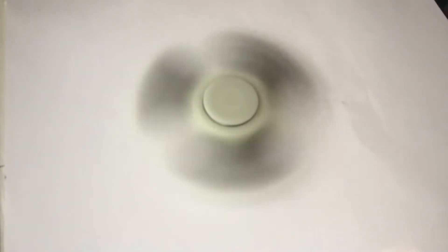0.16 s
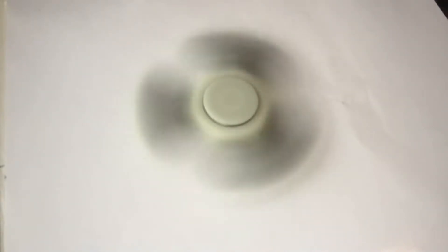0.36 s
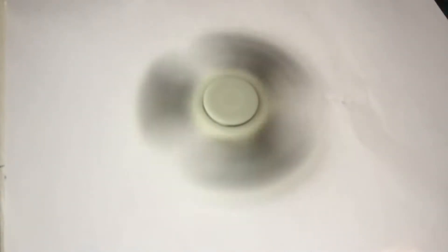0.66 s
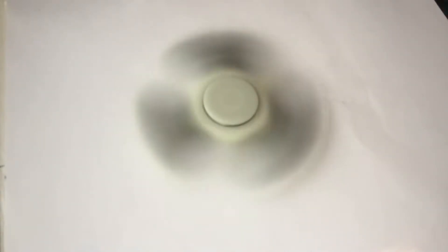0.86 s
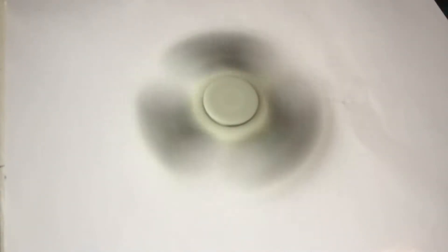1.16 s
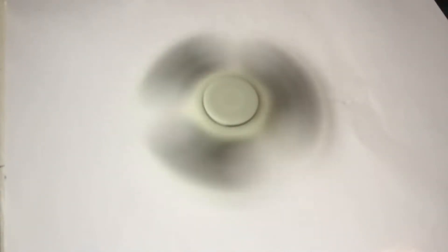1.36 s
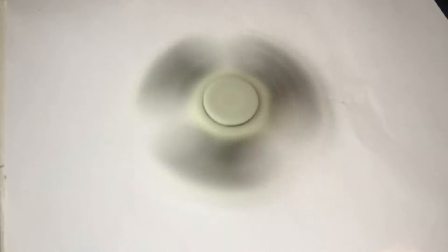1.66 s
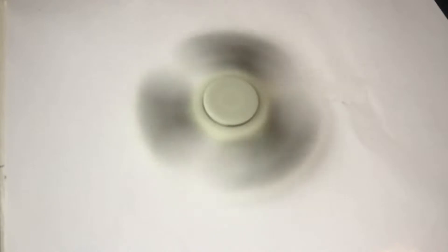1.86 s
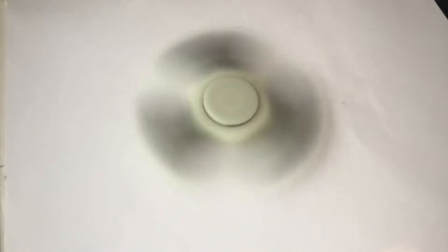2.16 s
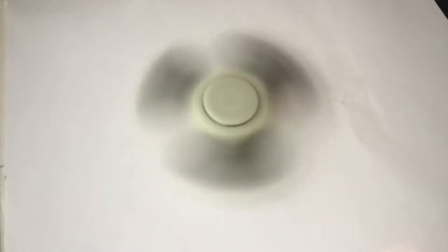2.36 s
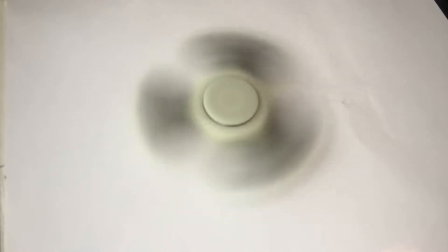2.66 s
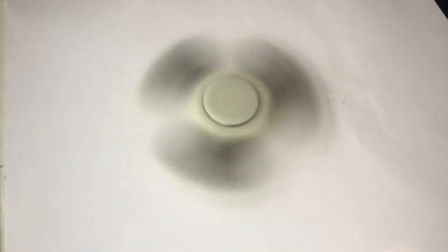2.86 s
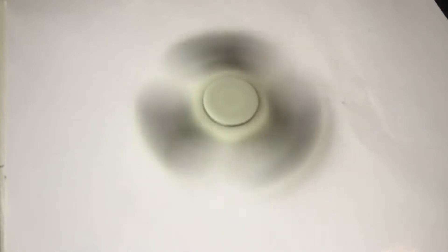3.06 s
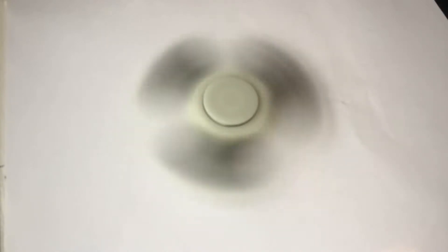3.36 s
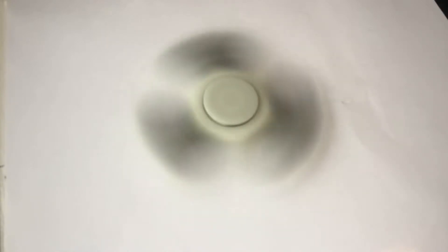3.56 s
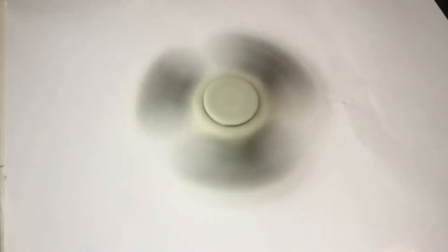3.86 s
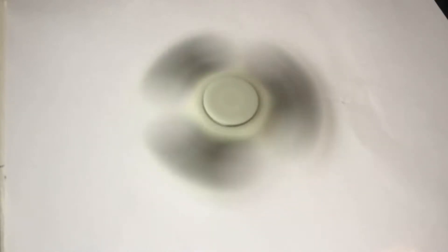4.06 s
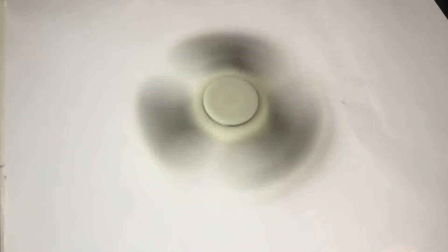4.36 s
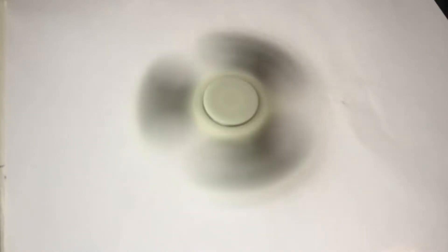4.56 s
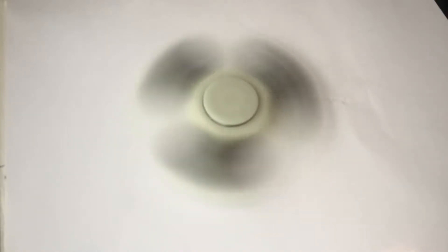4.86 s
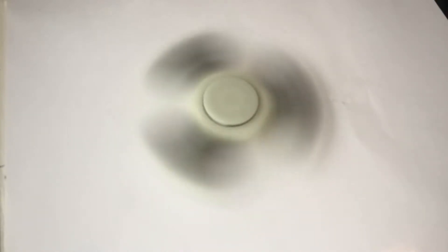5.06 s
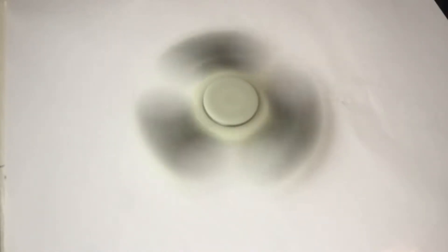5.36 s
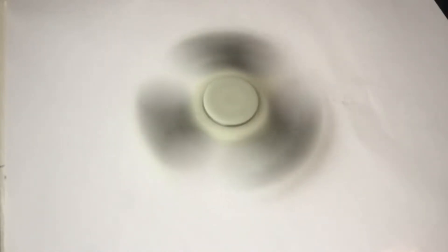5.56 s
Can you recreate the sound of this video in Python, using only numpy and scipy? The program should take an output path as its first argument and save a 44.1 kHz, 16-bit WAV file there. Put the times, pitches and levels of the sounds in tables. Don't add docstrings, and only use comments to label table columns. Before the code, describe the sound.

A small plastic three-armed spinner coasts on a hard table, heard very close through a mono microphone in a quiet room with short reflections. From the start a thin, dry, hissing rattle of bearing balls runs continuously, bright in the treble, fluttering at about eleven turns a second, with a weaker boxy buzz from the table. A light tap and brief bright rub open it; soft low bumps cluster from 0.2 to 0.8 seconds, with a dull rub around 0.6. More muffled knocks come at about 1.05, 1.2 and 1.7. A clearer, sharper tap lands at 2.1, another at 2.3, then hand rubbing with low rumble, strongest near 2.7. Small taps follow at 3.3 and 3.6, a livelier pair around 4.0 to 4.2, and faint ones at 4.5 and 5.25. The rattle flares briefly at times, slowly easing and softening until the end at 5.7, still spinning, over faint air hiss.

```python
import sys
import numpy as np
from scipy import signal
from scipy.fft import rfft, irfft
from scipy.io import wavfile
from scipy.ndimage import uniform_filter1d

SR = 44100
rng = np.random.default_rng(int(sys.argv[2]) if len(sys.argv) > 2 else 0)


def store_wav(level_fs):
    pcm = np.round(np.clip(np.atleast_2d(level_fs), -1, 1) * 32767)
    wavfile.write(sys.argv[1], SR, pcm.T.astype(np.int16))


def makeup_ratio(level_db):
    decades = np.asarray(level_db, float) / 20
    return 10 ** decades


N = 252119
CAGE = .64


def evened(x):
    return x / np.sqrt(np.mean(x ** 2) + 1e-20)


def add(mix, start_s, sound):
    part = mix[round(start_s * SR):][:len(sound)]
    part += sound[:len(part)]


def resonate(x, hz, width_hz, order=2):
    r = np.exp(-np.pi * width_hz * np.sqrt(order) / SR)
    g = (1 - r ** 2) / 2
    section = [g, 0, -g, 1, -2 * r * np.cos(2 * np.pi * hz / SR), r ** 2]
    return signal.sosfilt([section] * order, x)


def wander(hz):
    rate = np.fft.rfftfreq(N, 1 / SR) / hz
    gain = rate / (.4 + rate) / (1 + rate ** 2)
    return evened(irfft(rfft(rng.standard_normal(N)) * gain, N))


START_TURNS_PER_S, SLOWING_TURNS_PER_S2, EASING_TURNS_PER_S3 = 11.39, .24, .004


def turns_at(t):
    return START_TURNS_PER_S * t - SLOWING_TURNS_PER_S2 * t ** 2 / 2 + EASING_TURNS_PER_S3 * t ** 3 / 3


def balls(contacts_per_s=2500, spread_db=3.5, smooth=0.86, flicker_db=0.92, flicker_hz=50):
    size = makeup_ratio(spread_db * np.minimum(rng.exponential(1, N), 5)) * rng.choice([-1, 1], N)
    contacts = evened(size * (rng.random(N) < contacts_per_s / SR))
    rolling = smooth * rng.standard_normal(N) + np.sqrt(1 - smooth ** 2) * contacts
    return rolling * makeup_ratio(flicker_db * wander(flicker_hz))


# lobes_per_turn (of body or cage), centre_hz, reach_hz, depth (of power), angle_turns
BEAMS = [(1, 3300, 250, .23, -.45), (1, 5200, 600, .6, .34), (1, 7250, 450, .45, .34),
         (1, 8100, 350, .14, -.45), (1, 9500, 500, .22, .16), (1, 11100, 700, .42, -.09),
         (2, 3300, 250, .14, .01), (2, 3850, 350, .19, .23), (2, 4550, 350, .22, .4),
         (2, 5400, 330, .25, -.21), (2, 6080, 450, .5, .07), (2, 8000, 400, .14, -.02),
         (2, 9300, 600, .19, .31), (2, 15600, 900, .32, .18), (3, 4000, 600, .11, -.36),
         (3, 6150, 350, .19, -.13), (3, 7300, 480, .55, .1), (3, 8350, 800, .33, .48),
         (3, 11100, 900, .62, -.2), (CAGE, 3550, 600, .4, -.13), (CAGE, 5100, 900, .26, .33)]


def beaming(hz, turns):
    lobes, centre_hz, reach_hz, depth, angle_turns = np.transpose(BEAMS)
    share = depth * np.exp(-((hz - centre_hz) / reach_hz) ** 2)
    return share @ np.cos(2 * np.pi * (np.outer(lobes, turns) + angle_turns[:, None]))


# pitch_hz, width_hz, level_db
TABLE_MODES = [(275, 63, -73), (390, 46, -82.5), (495.3, 31, -77.5), (680.7, 41, -78), (856, 33, -84),
               (926, 51, -86), (973, 28, -87.5), (1044.6, 29, -78.5), (1192, 52, -82.5), (1306, 46, -80.5),
               (1388, 78, -84.5), (1490, 150, -78.5), (1630, 43, -78.5), (1746, 64, -78.5), (1914, 96, -84),
               (2074, 74, -81.3), (2192, 21, -79), (2300, 48, -78.5), (2377, 34, -75.5), (2454, 38, -77),
               (2534, 104, -79), (2629, 37, -78), (2717, 51, -79.5), (2830, 74, -82)]
# pitch_hz, width_hz, level_db
BODY_MODES = [(3231, 222, -62.5), (3375, 142, -60), (3710, 315, -60), (3970, 450, -62), (4397, 290, -60.5),
              (4738, 250, -61.5), (5157, 330, -62.5), (5355, 204, -60.5), (5795, 690, -66),
              (5866, 188, -62.5), (6170, 300, -62), (6800, 320, -64.5), (7023, 200, -59.5),
              (7445, 350, -62), (7980, 220, -63), (8420, 390, -61), (8890, 320, -66), (9450, 530, -64.5),
              (10950, 400, -70.5), (11450, 1140, -80), (15600, 2400, -76)]
ROCKING = [(1, .3, .36), (2, .12, .15), (3, .1, .15), (CAGE, .1, .4)]
# peak_s, level_db
FLARES = [(.4, 2.5), (1.053, 1), (1.395, 1), (1.555, 3.5), (1.695, 3), (1.835, 2), (2.295, 2), (2.5, 2.5),
          (4.01, 2), (4.095, 4.5), (4.485, 3), (4.625, 3), (4.91, 2), (5.225, 3)]
FLARE_S, FLARE_TOP_HZ = 0.017, 5640
RATTLE_DB, RATTLE_DB_PER_TURN_PER_S = 3.5, 1.77


def spinner(table_patch_db=3.0, body_patch_db=1.61, patch_hz=28, lobe_gain=0.97):
    step = 32
    t = np.arange(0, N + step, step) / SR
    turns = turns_at(t)
    lost_turns_per_s = START_TURNS_PER_S - np.gradient(turns_at(np.arange(N) / SR)) * SR
    drive = balls() * makeup_ratio(RATTLE_DB - RATTLE_DB_PER_TURN_PER_S * lost_turns_per_s)
    flare_db = sum(db * np.exp(-((t - s) / FLARE_S) ** 2) for s, db in FLARES)
    rocking = sum(depth * np.cos(2 * np.pi * (lobes * turns + angle)) for lobes, depth, angle in ROCKING)
    out = np.zeros(N)
    for k, (hz, width_hz, db) in enumerate(TABLE_MODES + BODY_MODES):
        in_table = k < len(TABLE_MODES)
        power = 1 + lobe_gain * (rocking if in_table else beaming(hz, turns))
        drift_hz = patch_hz * rng.uniform(.27, 1, 6)
        drift = sum(np.sin(2 * np.pi * (f * t + rng.random())) for f in drift_hz) / np.sqrt(3)
        patch_db = table_patch_db if in_table else body_patch_db
        mode_db = patch_db * drift + flare_db / (1 + (hz / FLARE_TOP_HZ) ** 6)
        beam = np.sqrt(np.maximum(power, .03)) * makeup_ratio(mode_db)
        ring = makeup_ratio(db) * evened(resonate(drive, hz, width_hz))
        out += (-1) ** k * ring * np.repeat(beam, step)[:N]
    return out


def room(x, t60_s=0.17, gap_s=.003, wet_db=-11):
    t = np.arange(SR // 4) / SR
    turns = turns_at(np.arange(N) / SR)
    tails = rng.standard_normal((4, len(t))) * makeup_ratio(-60 * t / t60_s) * (t > gap_s)
    tails = tails / np.linalg.norm(tails[0])
    facing = np.maximum(np.cos(2 * np.pi * (turns - np.arange(4)[:, None] / 4)), 0)
    wet = signal.oaconvolve(x * facing, tails, axes=1)[:, :N].sum(0)
    return (x + makeup_ratio(wet_db) * wet) / np.sqrt(1 + makeup_ratio(2 * wet_db))


# peak_s, fade_s (to fall by FADE_DB), rub_db, bright_over_rub_db, rumble_db
STROKES = [
    (0, 0.02, -67.5, 15, -71),
    (.15, 0.5, -79, 7, -80),
    (.58, 0.64, -75, -10, -71.5),
    (2.17, 0.1, -80, 10, -79),
    (2.31, 0.2, -78.5, 15.5, -67.5),
    (2.48, 0.08, -71.5, 12.5, -74),
    (2.71, 0.27, -65, -0.5, -67),
    (3.5, 1.7, -81, 7, -80),
    (5.2, .5, -89, -10, -79.5),
    (5.75, 0.2, -81, 9, -86),
]
FADE_DB, RESTING_DB = 10, -85
# pitch_hz, width_hz, level_db
BRIGHT_MODES = [(1040, 80, -20), (1390, 170, 0), (1620, 120, -4), (1780, 110, -2), (2900, 1800, -3)]


def hand():
    peak_s, fade_s, rub_db, bright_db, rumble_db = np.transpose(STROKES)
    from_peak_s = abs(np.arange(N) / SR - peak_s[:, None])
    swell_power = makeup_ratio(-2 * FADE_DB * from_peak_s / fade_s[:, None])
    levels_db = (rub_db, rub_db + bright_db, rumble_db)
    dull, bright, weight = (np.sqrt(makeup_ratio(2 * db) @ swell_power) for db in levels_db)
    noise = rng.standard_normal((3, N))

    rumble_modes = [(48, 30, 0), (134.4, 34, 4.0), (171, 27, 3.0)]
    rumble = evened(sum(makeup_ratio(db) * evened(resonate(noise[0], hz, w)) for hz, w, db in rumble_modes))
    rumble = rumble * np.hypot(weight, makeup_ratio(RESTING_DB))

    rub_modes = BRIGHT_MODES[1:] + [(2030, 230, -0.3), (4400, 2700, 0.92)]
    bright_rub = sum(makeup_ratio(db) * evened(resonate(noise[2], hz, 0.64 * w)) for hz, w, db in rub_modes)
    rub = dull * evened(resonate(noise[1], 377, 260)) + bright * evened(bright_rub)
    return rumble * makeup_ratio(2.1 * wander(35)) + rub * makeup_ratio(2.4 * wander(40))


# pitch_hz, level_db_per_hz
AIR_SPECTRUM = [(22, -28), (55, -4.5), (125, -4), (220, -6), (330, -5.5), (600, -6), (800, -5),
                (1120, -8.5), (2000, -8), (2800, -19.5), (5000, -7.5), (13000, -16.5), (15000, -25),
                (15700, -28)]
AIR_DB = -66.5


def air():
    hz, db = np.transpose(AIR_SPECTRUM)
    gain = makeup_ratio(np.interp(np.log(np.fft.rfftfreq(N, 1 / SR) + 1), np.log(hz), db))
    return makeup_ratio(AIR_DB) * evened(irfft(rfft(rng.standard_normal(N)) * gain, N))


# start_s, dull_peak_db, spot_hz (favoured there), bright_peak_db, rattle_s
TAPS = [(.016, -52.5, 570, -51.5, .015), (.47, -57, 620, -56, 0.0062), (1.051, -59, 850, -50.5, 0.0083),
        (2.102, -48.5, 400, -43.5, 0.015), (2.194, -69, 310, -57, .0088), (2.298, -62, 470, -48.5, .012),
        (3.31, -68.5, 480, -68, .008), (3.608, -60, 750, -50.5, .004), (3.998, -53.5, 560, -59, 0.017),
        (4.075, -55, 500, -47.5, 0.0022), (4.077, -46.5, 340, -70, .0068), (4.172, -58, 310, -54, .0054),
        (4.49, -57.5, 700, -62, .011), (5.26, -57, 450, -59, 0.016)]
# pitch_hz, width_hz
LOW_MODES = [(310, 67), (490, 104), (690, 41)]
SPOT_DB_PER_OCTAVE_SQUARED = 30


def taps():
    out, t = np.zeros(N), np.arange(SR // 5) / SR
    for start_s, dull_db, spot_hz, bright_db, rattle_s in TAPS:
        contact = 0.13 * rng.standard_normal(len(t)) * np.exp(-t / rattle_s) + (t == 0)
        rings = [resonate(contact, hz, w) for hz, w in LOW_MODES]
        rings.append(sum(makeup_ratio(db) * resonate(contact, hz, w) / w for hz, w, db in BRIGHT_MODES))
        peaks_db = [dull_db - SPOT_DB_PER_OCTAVE_SQUARED * np.log2(hz / spot_hz) ** 2 for hz, w in LOW_MODES]
        peaks_db.append(bright_db)
        add(out, start_s, sum(makeup_ratio(db) * ring / abs(ring).max() for db, ring in zip(peaks_db, rings)))
    low_cut = signal.butter(3, 210, "high", fs=SR, output="sos")
    return signal.sosfilt(low_cut, out)


# start_s, peak_db, pitch_hz
BUMPS = [(.231, -60, 137), (.299, -51, 65), (.305, -50, 122), (.322, -48.5, 190), (.33, -56, 483),
         (.497, -49.5, 130), (.52, -56, 120), (1.235, -66, 55), (.547, -53.5, 322), (.55, -63, 61.6),
         (.554, -58, 194), (.661, -52, 284), (.762, -51, 242), (.77, -63, 126), (1.215, -50.5, 210),
         (1.216, -58.5, 390), (1.226, -54, 129), (1.39, -63, 132), (1.667, -53.5, 272), (2.1, -65, 125),
         (2.29, -63, 302), (2.3, -68, 65), (2.468, -62, 64.4), (2.478, -61, 123), (2.585, -62, 143),
         (3.3, -63.5, 1045), (3.31, -63, 288), (4.005, -61, 1050), (5.25, -72, 60)]
# pitch_hz, rise_s, t60_s
BUMP_SHAPE = [(63, .019, .14), (128, 0.015, 0.2), (207, 0.011, 0.07), (290, .009, 0.082), (480, .008, .075),
              (1040, .007, .16)]


def bumps():
    out, t = np.zeros(N), np.arange(SR // 2) / SR
    pitch_hz, rises_s, t60s_s = np.transpose(BUMP_SHAPE)
    for start_s, peak_db, hz in BUMPS:
        rise_s = np.interp(np.log(hz), np.log(pitch_hz), rises_s)
        t60_s = np.interp(np.log(hz), np.log(pitch_hz), t60s_s)
        swell = np.sin(np.pi / 2 * np.minimum(t / rise_s, 1)) ** 2
        decay = makeup_ratio(-60 * np.maximum(t - rise_s, 0) / t60_s)
        add(out, start_s, makeup_ratio(peak_db) * swell * decay * np.sin(2 * np.pi * hz * t))
    return out


def scene():
    mono = room(spinner() + bumps()) + hand() + air() + taps()
    return np.array([mono, mono])


def masked(x, below_db=16.2, slope_db_per_hz=.0033, from_hz=5000):
    hz, _, z = signal.stft(x, SR, nperseg=2048, noverlap=1536)
    power = uniform_filter1d(abs(z) ** 2, size=7, axis=0)
    power = uniform_filter1d(power, size=3, axis=1)
    band_db = 10 * np.log10(power + 1e-20)
    fall_db = slope_db_per_hz * hz[:, None]
    mask_db = np.maximum.accumulate(band_db + fall_db, axis=0) - fall_db - below_db
    kept = (band_db > mask_db) | (hz[:, None] < from_hz)
    return signal.istft(z * kept, SR, nperseg=2048, noverlap=1536)[1][:N]


def roll_off(x):
    return signal.sosfilt(signal.butter(12, 15900, fs=SR, output="sos"), x)


def record(dry):
    x = signal.sosfilt(signal.butter(2, 42, "high", fs=SR, output="sos"), dry[:1])
    band_limit = signal.firwin(1023, 15760, window=("kaiser", 7), fs=SR)
    x = signal.oaconvolve(x, band_limit[None], "same")
    mix = np.array([masked(x[0])] * len(dry))
    return roll_off(mix)


dry = scene()
out = record(dry)
store_wav(out)
```